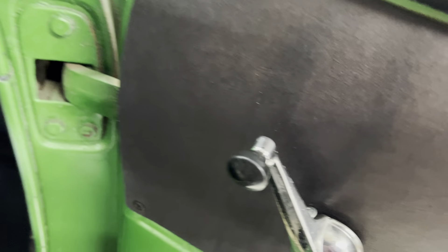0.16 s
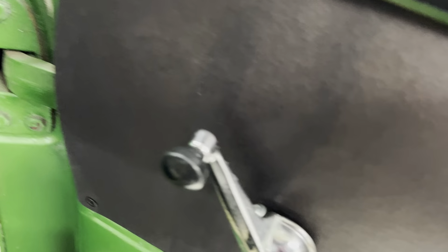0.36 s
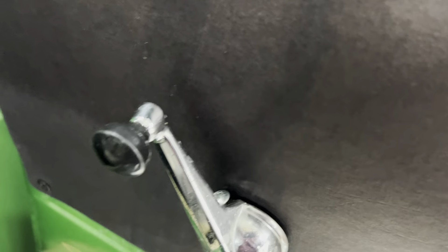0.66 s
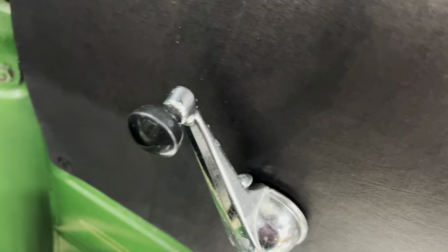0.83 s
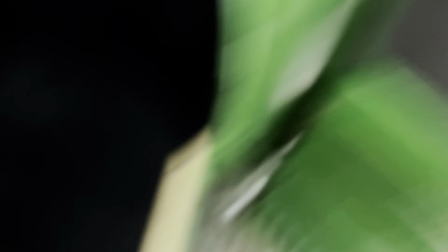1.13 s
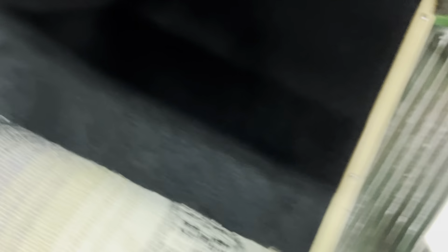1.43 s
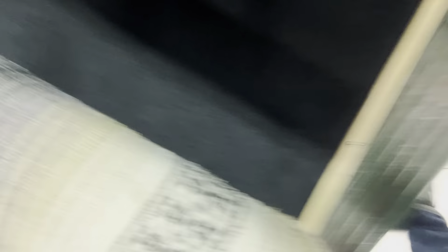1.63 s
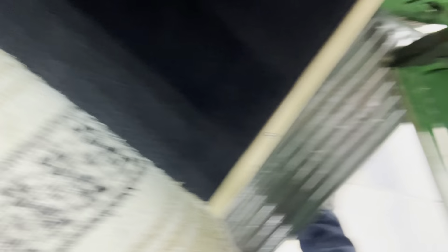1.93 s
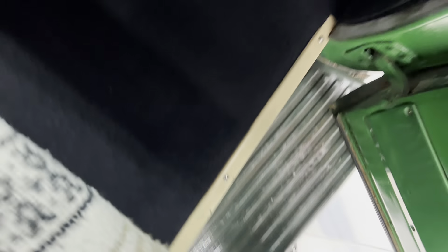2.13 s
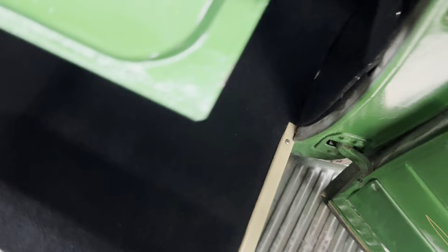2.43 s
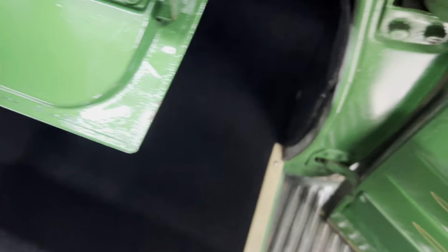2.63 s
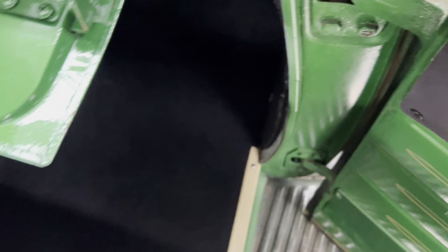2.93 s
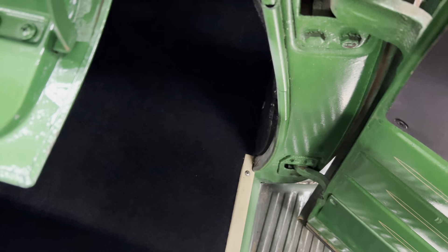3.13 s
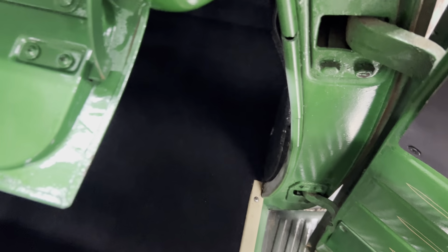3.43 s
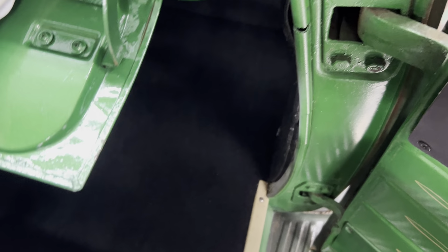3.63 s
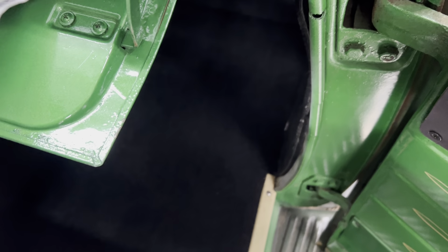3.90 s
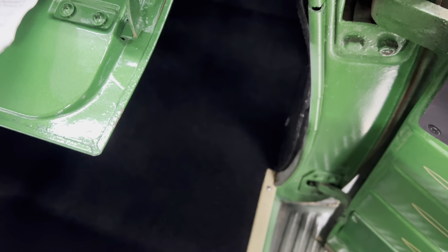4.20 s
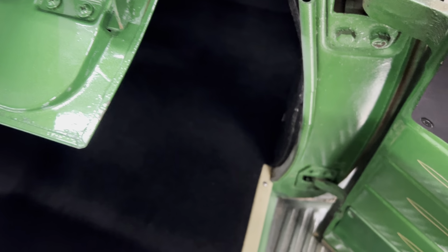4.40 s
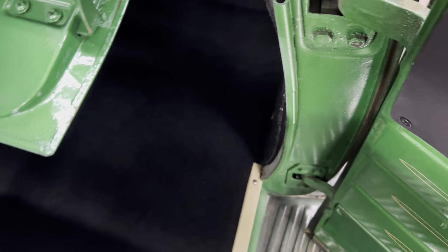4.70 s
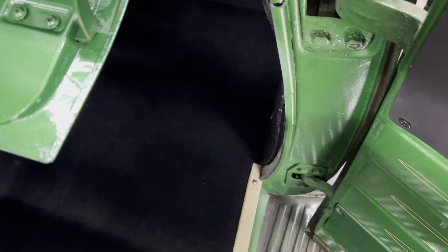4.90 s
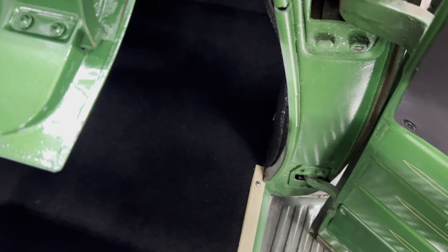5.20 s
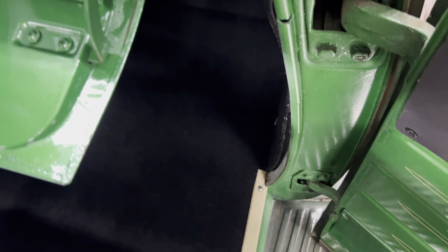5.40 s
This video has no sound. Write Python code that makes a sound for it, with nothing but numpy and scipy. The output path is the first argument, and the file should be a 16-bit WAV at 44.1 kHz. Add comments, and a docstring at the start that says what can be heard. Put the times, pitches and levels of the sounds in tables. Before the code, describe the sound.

Inside an old truck cab, a low hum runs steadily while a metal door and its latch are handled close to the microphone. Several clunks ring briefly and leave light rattles, and the door drags once with a short groan. In the second half, hands and cloth rustle right at the microphone among many dry, sharper clicks and ticks.

```python
"""Inside an old truck cab

A low hum fills the cab. Close by, latch and door knock and tick: each blow rings the metal and leaves
a short rattle. The door drags once with a groan. Later, hands and cloth rustle right at the microphone
between dry clicks; the rustle is many tiny slips. Two microphone ports hear it all with a small lag."""
import sys
import numpy as np
from scipy import signal
from scipy.fft import rfft, irfft, next_fast_len
from scipy.io import wavfile
from scipy.ndimage import uniform_filter1d

SR = 44100
rng = np.random.default_rng(int(sys.argv[2]) if len(sys.argv) > 2 else 0)


def dump(signal):
    """Clip the signal to [-1, 1] and save it as 16-bit WAV at the path in sys.argv[1]."""
    limited = np.clip(np.atleast_2d(signal).T, -1, 1)
    pcm = np.round(limited * 32767).astype(np.int16)
    wavfile.write(sys.argv[1], SR, pcm)


N = 244755
SPAN = next_fast_len(N + SR // 4)  # padded length for spectra

# how the hum moves: t/s, rumble level/dB, murmur level/dB, drone f/Hz
HUM_CURVES = [(0.0, -45.5, -40, 122.3), (0.74, -42, -38.5, 133.2), (1.37, -45.5, -39, 130.5),
              (1.55, -49, -37, 117.3), (1.64, -39, -43, 135.1), (1.98, -39.5, -47.5, 134.1),
              (2.18, -39, -38.5, 109), (2.47, -42.5, -42, 127.6), (2.84, -43.5, -42.5, 129),
              (3.14, -50, -40.5, 114.2), (3.82, -47, -40.5, 123.3), (5.55, -47, -45, 112.3)]
# tone colour of the deep rumble and of the murmur above it: f/Hz, level/dB
RUMBLE_SPECTRUM = [(18, -27), (30, -17), (42, -2), (58, -2.5), (75, -7.5), (95, -30.5)]
MURMUR_SPECTRUM = [(55, -15.5), (75, 0.5), (105, 5), (140, 2), (160, -10), (200, -15), (230, -10.5),
                   (270, -14), (320, -16.5), (420, -39), (800, -76)]
# strokes of hand and cloth: t/s, length/s, groan level/dB, hiss level/dB,
# level of the highest hiss during each stroke/dB, change over the stroke/dB
HAND_STROKES = [(0, 0.026, -39.5, -51.5, -52.5, -19.5), (0.983, 0.023, -60, -69, -79, 1.5),
                (1.2, 0.25, -80, -74, -76, 2), (1.403, 0.075, -63, -62, -68, 1),
                (2.439, 0.019, -57, -65.5, -58.5, 0.5), (2.718, 0.05, -60, -53.5, -51.5, 5.5),
                (2.794, 0.06, -54.5, -48, -48.5, 3.5), (2.915, 0.067, -47, -42.5, -46, -7.5),
                (3.016, 0.22, -48.5, -46, -51, -0.5), (3.28, 0.15, -56, -45.5, -51.5, -4.5),
                (3.463, 0.06, -43, -40.5, -53, -2.5), (3.548, 0.089, -41.5, -45.5, -54, 1.5),
                (3.678, 0.018, -41.5, -46.5, -52, -0.5), (3.769, 0.21, -68, -55.5, -59.5, 8),
                (4.052, 0.15, -54.5, -57.5, -65.5, -7), (4.213, 0.089, -59.5, -65, -71, 3),
                (4.365, 0.04, -61, -65, -72, 1), (4.434, 0.071, -55, -44.5, -54, -5.5),
                (4.546, 0.12, -56.5, -53.5, -59, 0), (4.676, 0.23, -51, -46.5, -45.5, -6.5),
                (4.843, 0.33, -52, -47, -52, 0.5), (5.196, 0.042, -57, -45.5, -50.5, 3),
                (5.296, .3, -50.5, -48.5, -49.5, -2.5)]
# faint stirring in the cab: t/s, level/dB
STIRRING = [(0.0, -56.5), (0.43, -49.5), (0.71, -56.5), (1.31, -55.5), (2.22, -41.5), (2.49, -60),
            (2.78, -56), (2.97, -61), (3.62, -45), (4.33, -61), (4.98, -58), (5.55, -62)]
# the door drags: t/s, level/dB
DOOR_DRAG = [(2.09, -36), (2.15, -31.5), (2.2, -20), (2.25, -14.5), (2.29, -18), (2.31, -28), (2.33, -29),
             (2.342, -42), (2.37, -62), (2.43, -55)]
# notes at which the rubbed panel groans: f/Hz, level/dB
GROAN_NOTES = [(200, -7), (250, -3), (365, 2), (425, 4), (492, 1), (635, 3), (840, -7), (1015, -14),
               (1175, -14), (1295, -16), (2050, -16)]
# tone colour of rustle, hiss and highest hiss: f/Hz, level/dB
RUSTLE_SPECTRUM = [(450, -15), (700, -5.5), (1000, 7.5), (1400, 2.5), (1900, 0), (2400, -14), (3300, -34.5)]
HISS_SPECTRUM = [(2000, -6.5), (2500, -1), (3100, -4.5), (3800, -1.5), (5500, -6.5), (6900, -7),
                 (9000, -14.5)]
TOP_HISS_SPECTRUM = [(6000, -31), (7200, -6.5), (10000, 5.5), (13000, 1), (15000, 6.5), (15800, -16),
                     (17000, -28)]
# centres of the rubbing bands that swell on their own: f/Hz
SWELL_BANDS = (700, 1100, 1600, 2200, 2900, 3700, 4600, 5600, 6800, 8500, 11500, 14000)
# blows on latch and door: t/s, ring level/dB, thud level/dB, crack level/dB, contact time/ms,
# the struck part's ring f/Hz, its thud f/Hz
METAL_BLOWS = [(0.171, -52.5, -38.5, -89, 26, 666, 242), (0.259, -50.5, -39.5, -72, 6.8, 1660, 257),
               (0.36, -36, -27.5, -53, 8.9, 2080, 256), (0.377, -40, -47, -48, 16, 2260, 230),
               (0.423, -23.5, -43, -42, 6.1, 2160, 298), (0.429, -24.5, -18.5, -41, 10.8, 1400, 245),
               (0.47, -36.5, -23, -78, 16.4, 1620, 273), (0.61, -52.5, -42, -62, 22, 1680, 205),
               (1.405, -50, -71, -54.5, 19, 1090, 263), (1.474, -44, -45, -44, 7.1, 2870, 340),
               (1.492, -18, -21, -51, 4.4, 884, 545), (1.495, -19.5, -15, -21.5, 7.1, 1280, 522),
               (1.506, -21.5, -19.5, -37, 5.1, 970, 282), (1.512, -32, -24, -42.5, 4.6, 1880, 242),
               (1.519, -39, -23.5, -61, 4, 646, 177), (1.647, -41.5, -30.5, -54, 35, 634, 290),
               (1.664, -33.5, -26, -66, 12, 1450, 302), (1.674, -52, -22, -43.5, 6, 1440, 303),
               (1.737, -35.5, -49, -42.5, 6, 1420, 226), (1.757, -51, -39, -48, 7.3, 1520, 255),
               (1.836, -55, -38.5, -55, 6.5, 1960, 304), (1.909, -39, -42, -40, 9.1, 1590, 330),
               (1.931, -38, -41.5, -65, 8.4, 880, 620), (1.995, -29.5, -27.5, -62, 24, 850, 683),
               (2.033, -19.5, -23, -21.5, 17.4, 1590, 657), (2.071, -41, -27, -62, 16, 650, 402),
               (2.216, -26, -45, -63, 5, 870, 430), (2.246, -25, -18, -33, 5, 1940, 206),
               (2.324, -53, -15.5, -67, 6.1, 600, 365), (2.454, -69, -33, -63, 37, 656, 215),
               (2.786, -37, -39, -58, 8.2, 1460, 540), (2.809, -40, -37, -36, 8.6, 3040, 677),
               (2.814, -24, -54, -33, 1.6, 4270, 392), (2.927, -25.5, -70, -23, 2.8, 3520, 690),
               (3.004, -37, -43, -30, 6.4, 2460, 360), (3.007, -31, -41, -28, 3, 3080, 357),
               (3.036, -31.5, -57, -47, 1.5, 2020, 650), (3.074, -36, -47, -38, 19, 2220, 670),
               (3.085, -40, -56, -34, 6.1, 2260, 650), (3.149, -54, -40, -55, 47, 3340, 210),
               (3.17, -41, -34, -38.5, 4.7, 677, 680), (3.228, -38.5, -65, -35.5, 4, 970, 650),
               (3.336, -43, -60, -43, 13, 2630, 300), (3.349, -33.5, -56, -40, 8.7, 2850, 190),
               (3.407, -46, -57, -42, 29, 2373, 278), (3.468, -24, -62, -55, 9.2, 1890, 710),
               (3.48, -23, -64, -25.5, 11, 1770, 550), (3.49, -34, -58, -29, 4.4, 2270, 520),
               (3.519, -31.5, -60, -41, 10.7, 1850, 694), (3.564, -28.5, -30.5, -36.5, 28, 1950, 686),
               (3.607, -30.5, -69, -31, 19, 1480, 700), (3.832, -33.5, -66, -28, 7.9, 2710, 691),
               (3.84, -32.5, -50, -25, 6.1, 2630, 690), (3.916, -46, -66, -38, 2, 3900, 260.2),
               (3.926, -38.5, -56, -49, 5.2, 1967, 260), (3.989, -40.5, -71, -45, 5.3, 5014, 268),
               (4.001, -46, -64, -33, 2.6, 3590, 268), (4.06, -45, -40, -46, 3.6, 1460, 200),
               (4.068, -44, -61, -50, 5.4, 2370, 221.3), (4.083, -55, -60, -38, 2.3, 2570, 220),
               (4.136, -36, -44, -57, 3.2, 1180, 540), (4.162, -44, -55, -46.5, 2.6, 1497, 260),
               (4.173, -43, -54, -60, 5.1, 1810, 260), (4.252, -52, -52, -53, 4, 900, 263),
               (4.278, -38, -39, -51, 5.9, 2550, 380), (4.288, -34.5, -46, -41, 0.39, 2930, 322),
               (4.331, -53, -68, -43.5, 2.06, 2900, 190), (4.38, -41, -57, -45, 2.2, 3530, 196),
               (4.395, -57, -72, -41, 3.4, 2420, 229.7), (4.414, -52, -48, -37, 1.75, 2370, 240),
               (4.42, -50, -58, -40, 4.5, 2400, 235.5), (4.426, -48, -56, -35, 2, 2400, 240),
               (4.7019, -32, -51, -32.5, 4, 1980, 420), (4.759, -23.5, -34, -18.5, 1.9, 3000, 540),
               (4.771, -47, -61, -40, 3.6, 2200, 500), (4.832, -31, -45, -31.5, 2.2, 2250, 610),
               (4.849, -50, -34.5, -25, 2.85, 3330, 306), (4.854, -31, -51, -20.5, 3.8, 3830, 324),
               (4.858, -27, -39, -29, 3.5, 1100, 320), (4.982, -50, -57, -37, 5, 2687, 660),
               (5.018, -46, -50, -37, 16, 2540, 300), (5.092, -32.5, -48, -47, 3.2, 1110, 374),
               (5.097, -38.5, -44, -52, 9.5, 1010, 374), (5.129, -33, -42, -44, 2.6, 3080, 408),
               (5.138, -42, -53, -39, 9.8, 2940, 340), (5.147, -38, -61, -32.5, 9, 2900, 338.4),
               (5.169, -31, -47, -25.5, 2.6, 4080, 330), (5.368, -44, -48, -40, 13, 3540, 265),
               (5.414, -42, -66, -38, 22, 2456, 287), (5.437, -34.5, -40.5, -29, 19.6, 1530, 330),
               (5.444, -29.5, -56, -34, 11, 2460, 403), (5.46, -48, -58, -41, 8.8, 2430, 405),
               (5.524, -44, -45, -39, 6, 858, 186)]
# notes of the struck door panel: f/Hz, level/dB, time to fade by 60 dB before extra damping/s
PANEL_NOTES = [(167, -1, 1), (257, -5, 0.67), (362, -1.5, 0.11), (475, -13, 0.27), (576, -9, 0.18),
               (866, 6.5, 0.056), (1032, 0, 0.08), (1260, 3.5, 0.23), (1450, -7.5, 0.072),
               (1460, -28, 0.086), (1970, -18, 0.13), (2450, -35, 0.024), (2580, -46.5, 0.2),
               (2970, -19, 0.056), (3354, -4.5, 0.087), (3600, -28, 0.088), (4150, -39, 0.12),
               (4780, -13.5, 0.1)]
# how far the left port is ahead of the right: f/Hz, phase/rad
LEFT_LEAD = [(0, 0), (500, .3), (900, .5), (1300, 2.3), (1650, .1), (2800, .7), (4600, .3), (5700, -1.2),
             (6500, -.2), (7300, -.5), (9850, -3.14), (12900, -6.3), (16200, -9.4), (22050, -9.4)]
# how much louder the left port is: f/Hz, level/dB
LEFT_LOUDER = [(60, 1.5), (110, -0.2), (200, 1.5), (380, 3.5), (700, 3), (1290, -1.5), (2380, 2.5),
               (4400, 3.5), (8120, 0), (15000, 0)]
# how alike the ports sound: f/Hz, likeness (1 = the same)
PORT_LIKENESS = [(40, 0.97), (200, 0.97), (400, 0.93), (1000, 0.7), (1700, 0.5), (2400, 0.9), (5500, 0.7),
                 (8000, 0.95), (10000, 1), (16000, .97)]

# one value for each layer of rubbing: groan, rustle, hiss, highest hiss
STIR_LAYERS_DB, DRAG_LAYERS_DB = (-6, -9.5, -20.5, -28), (-3, -15, -58, -56)  # added to their curves
RATTLE_DB = (-26.5, -11.5, -11, -38.5)  # added to the blow's thud, ring, crack and crack
RATTLE_T60_S = (0.48, 0.12, 0.11, 0.074)  # T60: the time to fade by 60 dB

LATE_S = 2  # from this time on the blows sound brighter, drier and shorter
EARLY_DAMPING, LATE_DAMPING = 2.2, 5  # these speed up the panel's fade, before and after LATE_S


def undb(db):
    """Turn decibels into a gain."""
    return 10 ** (np.asarray(db) / 20)


def along(table, hz):
    """Read a table between its rows, with pitch spaced by octaves."""
    f, value = np.transpose(table)
    return np.interp(np.log(hz + 1), np.log(f + 1), value)


def curves(table):
    """Turn columns into curves in time; silent outside the table unless it runs to the end."""
    times, *columns = np.transpose(table)
    after = -120 if times[-1] < N / SR - .1 else None
    return [np.interp(np.arange(N) / SR, times, c, left=-120, right=after) for c in columns]


def colour(x, table):
    """Give a sound the tone colour of a table, at an average (rms) level of 1."""
    hz = np.fft.rfftfreq(SPAN, 1 / SR)
    inside = (hz > table[0][0]) & (hz < table[-1][0])
    shaped = irfft(rfft(x, SPAN) * undb(along(table, hz)) * inside, SPAN)[:N]
    return shaped / np.sqrt(np.mean(shaped ** 2))


def band(x, lo_hz, hi_hz):
    """Keep what lies between two pitches."""
    return signal.sosfilt(signal.butter(3, [lo_hz, hi_hz], "bandpass", fs=SR, output="sos"), x)


def wander(per_s):
    """A smooth random curve, roughly between -1 and 1."""
    hold = int(SR / per_s)
    steps = np.repeat(rng.standard_normal(N // hold + 1), hold)
    return uniform_filter1d(uniform_filter1d(steps, hold), hold)[:N]


def peaked(x, db):
    """Bring the loudest 3 ms of each row to this level."""
    return x * undb(db) / np.sqrt(uniform_filter1d(x ** 2, SR // 300).max(axis=1, keepdims=True))


def after_blows(db, t60_s):
    """Power that jumps at each blow and dies away."""
    kicks = np.zeros(N)
    np.add.at(kicks, (np.transpose(METAL_BLOWS)[0] * SR).astype(int), undb(2 * db))
    return signal.lfilter([1], [1, -np.exp(-2 * np.log(1000) / (t60_s * SR))], kicks)


def hum():
    """Low noise booms in the cab under a wavering drone; each thud shakes the cab and adds rumble."""
    rumble_db, murmur_db, drone_hz = curves(HUM_CURVES)
    phase = 2 * np.pi * np.cumsum(drone_hz * (1 + 0.0393 * wander(22))) / SR
    drone = np.sin(phase) + undb(-20.5) * np.sin(2 * phase)
    drone *= np.sqrt(2) * undb(murmur_db - 1.5 + 1.8 * wander(23))
    rumble = colour(rng.standard_normal(N), RUMBLE_SPECTRUM)
    murmur = colour(rng.standard_normal(N), MURMUR_SPECTRUM)
    thud_db = np.transpose(METAL_BLOWS)[2]
    jolt = uniform_filter1d(after_blows(thud_db - 16, t60_s=0.94), SR // 30)
    return np.sqrt(undb(2 * rumble_db) + np.abs(jolt)) * rumble + undb(murmur_db + 0.5) * murmur + drone


def strokes(attack_s=0.0026, release_s=0.064):
    """Power of the four rubbing layers as each hand stroke sets in, swells or sags, and lets go."""
    start, length, groan_db, hiss_db, top_db, change_db = np.transpose(HAND_STROKES)[:, :, None]
    t = np.arange(N) / SR - start
    gate = np.clip(t / attack_s, 0, 1) * np.clip(1 - (t - length) / release_s, 0, 1)
    power = (gate * undb(change_db * np.clip(t / length, 0, 1))) ** 2
    rustle_db = (groan_db + hiss_db) / 2 - 3.5
    return [undb(2 * db[:, 0]) @ power for db in (groan_db, rustle_db, hiss_db, top_db)]


def rubbing_levels():
    """Strokes, stirring, rattle after blows and the door's drag add up in each layer; gives dB."""
    start, ring_db, thud_db, crack_db = np.transpose(METAL_BLOWS)[:4]
    late_db = np.where(start < LATE_S, 0, -4)  # later blows rattle less
    (drag_db,), (stir_db,), hands = curves(DOOR_DRAG), curves(STIRRING), strokes()
    levels = []
    for k, blow_db in enumerate((thud_db, ring_db, crack_db, crack_db)):
        stir = undb(2 * (stir_db + STIR_LAYERS_DB[k]))
        rattle = after_blows(blow_db + late_db + RATTLE_DB[k], RATTLE_T60_S[k])
        drag = undb(2 * (drag_db + DRAG_LAYERS_DB[k]))
        power = uniform_filter1d(hands[k] + stir + rattle + drag, SR // 100, origin=SR // 201)
        levels.append(10 * np.log10(np.abs(power) + 1e-14))
    return levels


def slips(spread_db, per_s, fade_s=.003, bed_power=1.6):
    """Rubbing surfaces slip in many tiny, uneven bursts over a bed of even hiss."""
    sizes = (rng.random(N) < per_s / SR) * undb(spread_db * np.minimum(rng.exponential(size=N), 4))
    bursts = signal.lfilter([1], [1, -np.exp(-1 / (fade_s * SR))], sizes ** 2)
    return rng.standard_normal(N) * np.sqrt(bed_power + bursts)


def shifting_cloth(x):
    """As the cloth moves, each band of pitch swells on its own, more so after LATE_S."""
    hz, spectrum = np.fft.rfftfreq(SPAN, 1 / SR), rfft(x, SPAN)
    depth_db = np.where(np.arange(N) / SR < LATE_S, 1.3, 3.4)
    shares = (np.interp(hz, SWELL_BANDS, row) for row in np.eye(len(SWELL_BANDS)))
    return sum(undb(depth_db * wander(16)) * irfft(spectrum * share, SPAN)[:N] for share in shares)


def groan(shake, width_hz=13):
    """The shaken panel rings on at a few narrow notes over one broad, low band."""
    notes = sum(undb(db) * signal.lfilter(*signal.iirpeak(hz, hz / width_hz, SR), shake)
                for hz, db in GROAN_NOTES)
    return notes + undb(-11) * band(shake, 120.0, 790.0)


def rubbing():
    """One stream of slips rustles and hisses, flickering a little; a sparser one makes the panel groan."""
    groan_db, *layer_dbs = rubbing_levels()
    scrape = slips(spread_db=2.6, per_s=500) * undb(2.0 * wander(45))
    shake = slips(spread_db=0.54, per_s=300)
    scrape = shifting_cloth(scrape)
    out = groan(shake * undb(groan_db)) / np.std(groan(shake))
    for db, spectrum in zip(layer_dbs, (RUSTLE_SPECTRUM, HISS_SPECTRUM, TOP_HISS_SPECTRUM)):
        out += undb(db + 0.4 * wander(26.72)) * colour(scrape, spectrum)
    return out


def panel_ring(t, early, spot_db=4.5):
    """The door panel's low and high notes, one row a blow; each struck spot mixes them differently."""
    hz, db, t60 = np.transpose(PANEL_NOTES)[:, :, None]
    mix = undb(db.T + spot_db * rng.standard_normal((len(early), hz.size)))
    fade = np.log(1000) * (1 + hz / 5000) * t / t60
    waves = np.sin(2 * np.pi * hz * t)
    long, short = (np.exp(-damping * fade) * waves for damping in (EARLY_DAMPING, LATE_DAMPING))
    low, high = mix * (hz.T < 700), mix * (hz.T >= 700)
    return [np.where(early, part @ long, part @ short) for part in (low, high)]


def blows():
    """A short, rough contact rings the panel and the struck part, giving a ring, a thud and a crack."""
    t = np.arange(4096) / SR
    start, ring_db, thud_db, crack_db, ms, ring_hz, thud_hz = np.transpose(METAL_BLOWS)[:, :, None]
    count, early = len(start), start < LATE_S
    rise = np.minimum(t / (0.000081 + ms / 9000), 1)
    fall = np.exp(-(t / np.maximum(ms / 1000, .0005)) ** 0.92)
    rough_db = 2.5 * np.repeat(rng.standard_normal((count, len(t) // 32)), 32, axis=1)
    contact = rise * fall * undb(rough_db)
    push, grind = rng.standard_normal((2, count, len(t))) * contact
    low_notes, high_notes = panel_ring(t, early)

    def struck(response, db):
        """The push of the contact sets something ringing."""
        return peaked(signal.fftconvolve(push, response, axes=1)[:, :len(t)], db)

    def ping(hz, cycles):
        """One note that dies within a few cycles."""
        return np.exp(-hz * t / cycles) * np.sin(2 * np.pi * hz * t)

    pin_db = 10 * (ring_hz > 4000)  # the highest parts are small pins that ping clearly
    part = struck(ping(ring_hz, cycles=np.maximum(2.8, .0015 * ring_hz)), 1.5 + pin_db)
    ring = struck(high_notes, -2) + part + peaked(band(grind, 397.0, 2820.0), -0.91)
    thud = band(struck(low_notes, -6.5) + struck(ping(thud_hz, cycles=2.6), -2.1), 194.0, 1800.0)
    dull = band(grind, 3200.0, 8800.0) + 0.21 * band(grind, 11000.0, 15440.0)
    bright = band(grind, 3300.0, 13000.0) + 0.55 * band(grind, 10900.0, 20000.0)
    snap = np.where(early, dull * contact ** .45, bright * contact ** .8)  # later: brighter, shorter
    crack_hz = np.clip(5600 * np.exp(0.24 * rng.standard_normal((count, 1))), 3400, 9000)
    crack = peaked(snap, -0.17) + struck(ping(crack_hz, cycles=1.0), -19.5)
    sounds = peaked(ring, ring_db) + peaked(thud, thud_db) + peaked(crack, crack_db)
    sounds *= np.cos(np.pi / 2 * t / t[-1])
    out = np.zeros(N + SR)
    for i, sound in zip((start[:, 0] * SR).astype(int), sounds):
        out[i:i + len(t)] += sound
    return out[:N]


def cab_echo(x, t60_s=0.16):
    """The cab adds a short echo; sounds after LATE_S get less of it."""
    t = np.arange(SR // 4) / SR
    tail = rng.standard_normal(len(t)) * np.exp(-np.log(1000) * t / t60_s) * np.minimum(t / 0.006, 1)
    tail = band(tail, 180.0, 3200.0)
    sent = x * undb(np.where(np.arange(N) / SR < LATE_S, -17, -25))
    return x + signal.fftconvolve(sent, tail / np.sqrt(np.sum(tail ** 2)))[:N]


def ports(x, scatter_s):
    """The two microphone openings differ in timing and level; reflections reach each differently."""
    hz = np.fft.rfftfreq(SPAN, 1 / SR)
    t = np.arange(SR // 8) / SR
    scatter = rng.standard_normal(len(t)) * np.exp(-t / scatter_s)
    reflections = rfft(scatter / np.sqrt(np.sum(scatter ** 2)), SPAN)
    alike = np.clip(along(PORT_LIKENESS, hz), 0, 1)
    same, apart = np.sqrt((1 + alike) / 2), np.sqrt((1 - alike) / 2) * reflections
    lead = np.exp(.5j * np.interp(hz, *np.transpose(LEFT_LEAD)))
    tilt = lead * undb(along(LEFT_LOUDER, hz) / 2)  # each port takes half
    left, right = (same + apart) * tilt, (same - apart) / tilt
    return irfft(rfft(x, SPAN) * np.array([left, right]), SPAN)[:, :N]


def scene():
    """Hum, rubbing and blows as the two ports hear them."""
    return (ports(hum(), scatter_s=0.025) + ports(rubbing(), scatter_s=0.035)
            + ports(cab_echo(blows()), scatter_s=0.0075))


def record(dry):
    """The recorder cuts the treble above 16600 Hz."""
    return signal.sosfilt(signal.ellip(10, .2, 80, 16600, fs=SR, output="sos"), dry)


dry = scene()
out = record(dry)
dump(out)
```